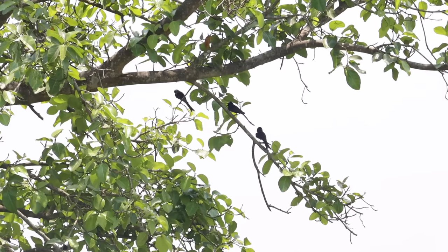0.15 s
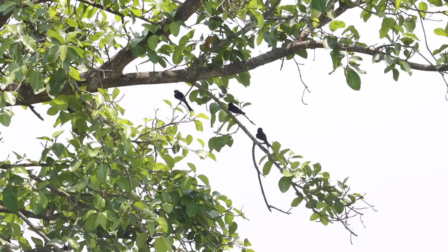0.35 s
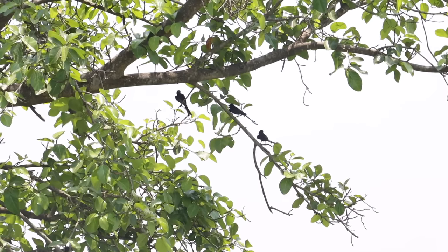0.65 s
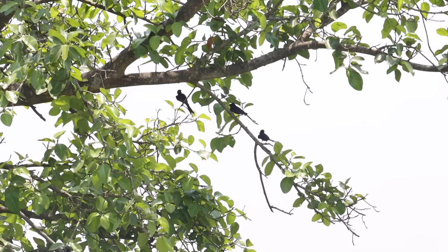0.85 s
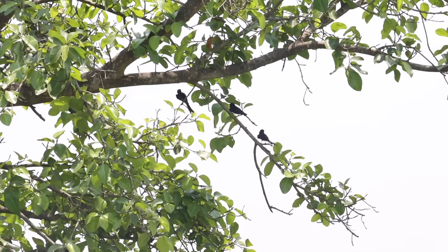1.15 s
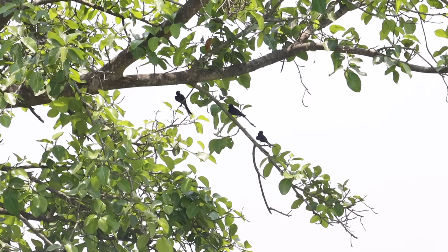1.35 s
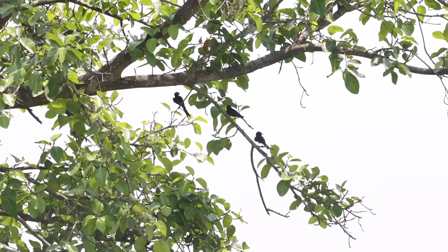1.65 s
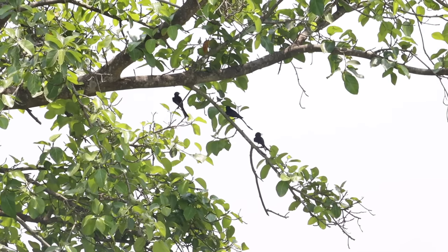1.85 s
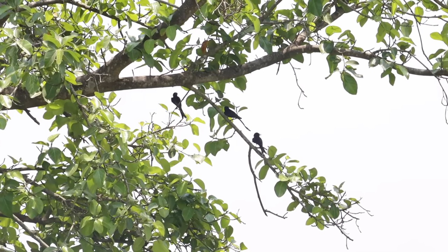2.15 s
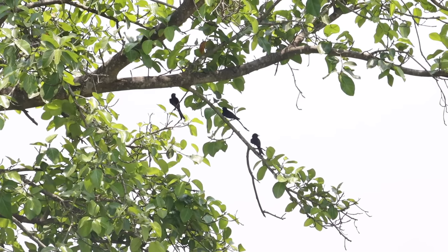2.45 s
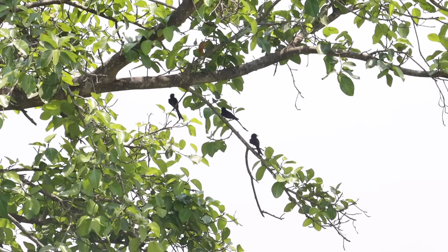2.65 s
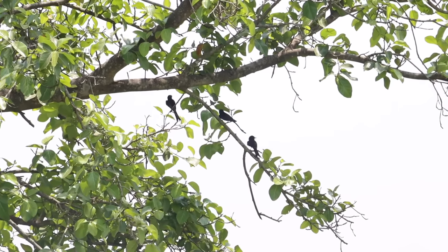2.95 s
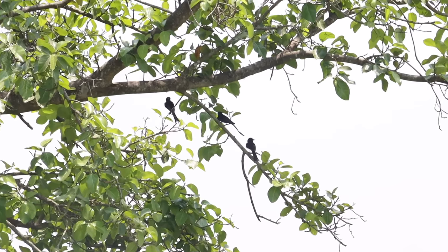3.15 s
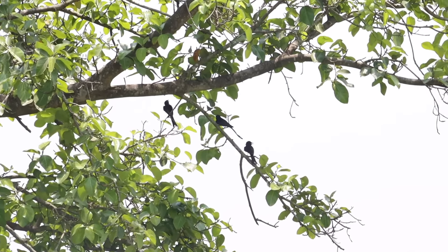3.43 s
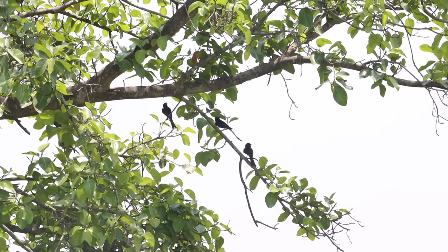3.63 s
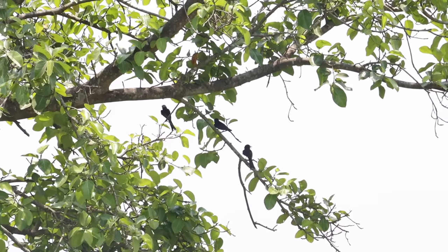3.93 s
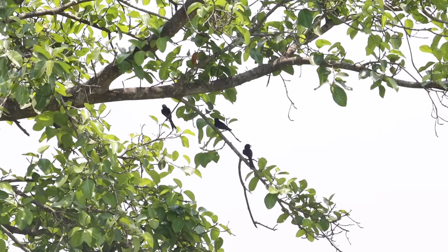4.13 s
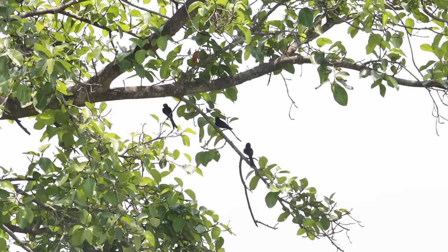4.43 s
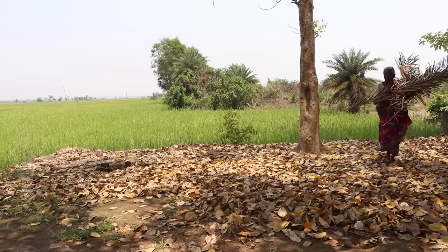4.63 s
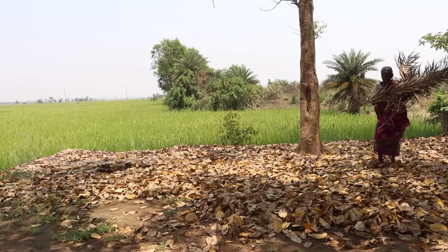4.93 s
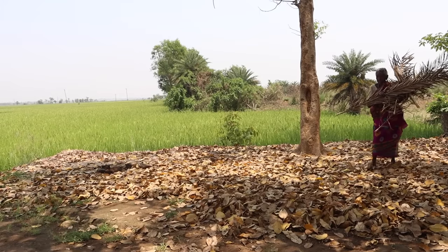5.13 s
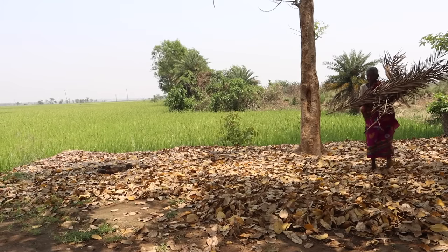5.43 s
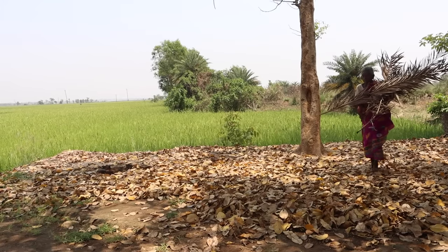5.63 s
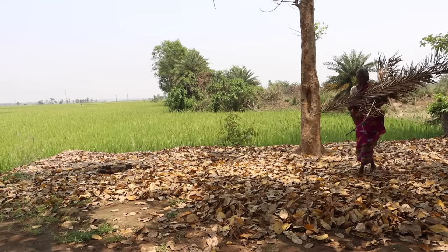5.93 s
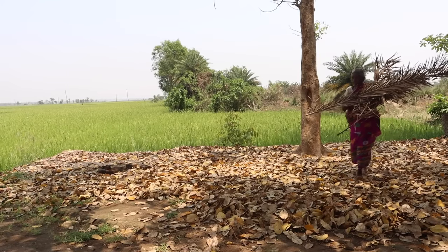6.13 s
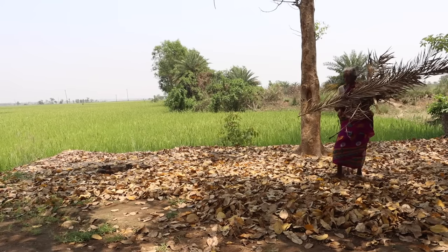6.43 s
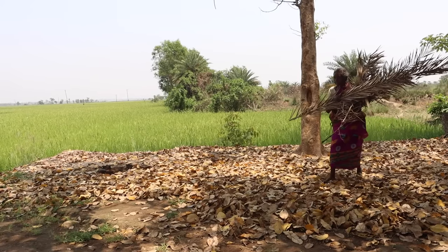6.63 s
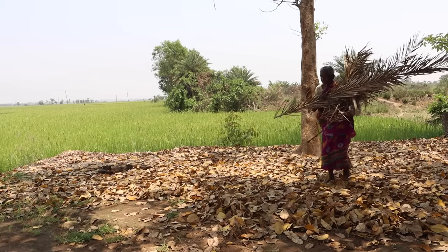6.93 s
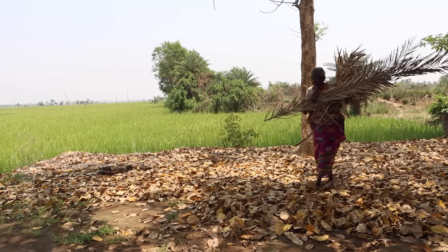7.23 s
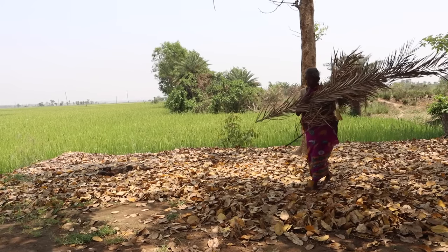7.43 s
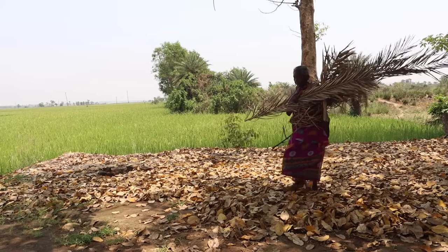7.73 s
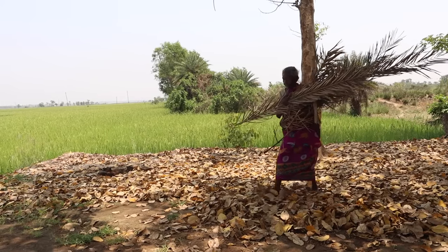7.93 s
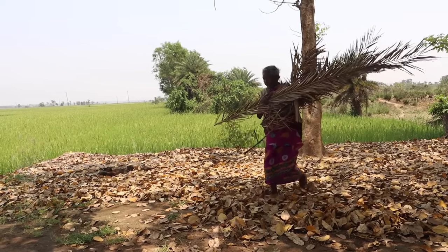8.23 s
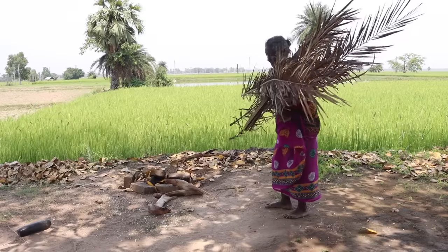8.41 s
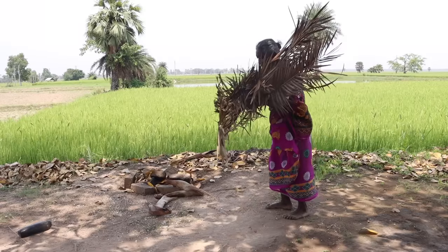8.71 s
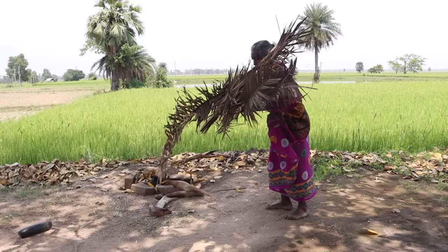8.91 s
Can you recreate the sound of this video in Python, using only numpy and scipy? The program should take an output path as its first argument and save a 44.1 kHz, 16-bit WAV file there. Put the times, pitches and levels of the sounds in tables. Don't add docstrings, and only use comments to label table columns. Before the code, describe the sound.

Quiet open countryside, close stereo microphone, little reverberation. From 0 to 4.5 s something stiff scrapes dry ground in short uneven strokes, grainy and midrange-bright with a slightly ringing body; faint ticks come at 0.2 s. Strokes strengthen around 1.9 and 2.6 s and become denser from 3 s. Distant birds give short hoarse whistles, clearest near 2 s, over faint air and a thin high insect band. At 4.55 s the scene cuts abruptly to dry palm fronds carried over dead leaves: loud crackling swish, swelling near 4.9, 6.5, 7.2 and 7.9 s, with sharp stalk snaps and brief dips as steps halt, moving from right to centre. Low wind puffs buffet one side or the other. At about 8.35 s another cut: fronds are lowered, the rustle softer but rising toward 9 s, with bright snaps and heavy low wind thumps, mostly left after 8.5 s.

```python
import sys
import numpy as np
from scipy import signal
from scipy.io import wavfile
from scipy.ndimage import uniform_filter1d

SR = 44100
rng = np.random.default_rng(int(sys.argv[2]) if len(sys.argv) > 2 else 0)


def transcribe(u):
    v = np.clip(np.atleast_2d(u).T, -1, 1)
    q = np.round(v * 32767).astype(np.int16)
    wavfile.write(sys.argv[1], SR, q)


def to_linear_factor(level_db):
    exponent = np.asarray(level_db, float) / 20
    return 10 ** exponent


N = 399987
TIME = np.arange(N) / SR
FIRST_CUT_S, SECOND_CUT_S = 4.5505, 8.355

# frequency in Hz, level in dB per Hz.
AIR_COLOUR = [(20, -70), (48, 3), (140, 0.5), (340, -4.5), (520, -11), (860, -12), (1400, -15.5),
              (1900, -11.5), (3100, -16), (5000, -19), (7000, -21), (9500, -26), (14500, -28)]
AIR_DB = -56
INSECT_HZ, INSECT_WIDTH_HZ, INSECT_DB = 10270, 820, -70
HUM_HZ, HUM_WIDTH_HZ, HUM_DB = 452.6, 19, -69
# frequency in Hz, share in common (0 to 1).
AIR_LIKENESS = [(60, 1), (300, 0.73), (800, 0.03), (3000, 0.036), (12000, 0.067)]
SCRAPE_LIKENESS = [(800, 0.72), (1500, 0.55), (3000, 0.52), (5000, 0.69), (12000, 0.21)]
FROND_LIKENESS = [(200, 1), (500, 0.83), (1000, 0.74), (1900, 0.44), (2600, 0.23), (6000, 0.34),
                  (14000, 0.1)]
# time in seconds, samples by which the left port hears later.
LEFT_LAG = [(0, -6), (1.7, -6), (1.71, 0), (4.55, 0), (4.551, 5.4), (6.5, 4), (8.3, 2.8), (9.07, 2)]

# start in seconds, length in seconds, first pitch in Hz, last pitch in Hz, level in dB.
CHIRPS = [(.735, .035, 5550, 5450, -52), (.75, .04, 4350, 4300, -55), (.77, .04, 4050, 4000, -57),
          (.78, .04, 3100, 3250, -58), (.16, .06, 5600, 5750, -66), (.1, .05, 2250, 2200, -64),
          (.2, .1, 2500, 2300, -66), (.74, .06, 2600, 2700, -62), (.94, .025, 6200, 5100, -57),
          (1.35, .12, 1300, 1250, -56), (1.41, .11, 3550, 3250, -55), (1.545, .02, 6600, 6300, -64),
          (1.57, .09, 3000, 2950, -62), (1.73, .09, 3600, 3500, -65), (1.81, .08, 2050, 2100, -61),
          (1.875, .025, 6200, 6000, -59), (1.93, .2, 1380, 1580, -51), (2.05, .08, 3300, 2900, -45),
          (1.93, .1, 2850, 3100, -46), (1.91, .09, 3880, 3850, -41), (2.165, .06, 2850, 3000, -52),
          (2.53, .1, 1550, 1450, -50), (2.345, .02, 6100, 4700, -63), (2.495, .02, 6200, 4800, -65),
          (2.7, .14, 2200, 2050, -59), (2.64, .12, 3350, 3330, -51), (2.705, .09, 4400, 4350, -56),
          (2.72, .08, 2400, 2450, -61), (4.26, .22, 4700, 4600, -48), (8.15, .06, 2850, 2850, -42)]

# time in seconds, peak in dB, seconds to rise or fall 20 dB, left minus right in dB.
GUSTS = [(4.588, -52.5, 0.06, 18.5), (4.745, -52, 0.1, 21), (5.522, -41.5, 0.14, -5), (5.6, -54, 0.5, 3),
         (5.73, -45, 0.04, -9), (5.903, -50.5, 0.06, 18), (6.043, -47, 0.13, 6), (6.125, -49, 0.09, -9),
         (6.84, -50, 0, 25), (7.05, -54.5, 0.8, 17), (7.1, -50, 0, 15), (7.19, -42.5, 0.07, 12),
         (7.335, -47, -0.02, 27), (7.65, -49, 0.1, -1), (7.83, -45, 0.03, 3.5), (8.36, -45.5, 0.03, 12),
         (8.49, -38, 0.1, 7), (8.6, -49, 0.2, 17), (8.73, -39.5, .08, 22), (8.86, -45, 0.04, 12),
         (9.031, -52, -0.2, 16)]
# frequency in Hz, level in dB per Hz.
GUST_COLOUR = [(25, -17), (50, -4.5), (80, 1), (130, -3), (200, -20), (320, -26.5), (600, -44.5)]
BREEZE_DB = -63.5
PUFF_RISE_SHARE = 0.55
# time in seconds, peak in dB, swing in Hz, left minus right in dB.
THUMPS = [(4.56, -39, 90, 16), (4.589, -28.5, 111, 13), (5.525, -34, 120, 3), (5.905, -33.5, 90, 18),
          (7.335, -32, 104, 17), (8.434, -26.5, 262, -16), (8.438, -21.5, 100, -16),
          (8.456, -23.5, 150, -8), (8.48, -27, 85, 9), (8.572, -33, 100, 14), (8.602, -33, 125, 18),
          (8.63, -38, 80, 21), (8.702, -28.5, 200, 21), (8.714, -23, 150, 17), (8.727, -25, 106, 17),
          (8.748, -33, 100, 14), (8.767, -26, 80, 11), (8.802, -34, 120, 14), (8.826, -25.5, 120, 17),
          (8.846, -23, 134, 16)]
THUMP_CYCLES = 0.57

# time in seconds, peak in dB, ring in Hz.
TICKS = [
    (0.22, -42, 7040),
    (0.2299, -41, 7170),
    (0.2409, -35, 5050),
    (0.2425, -36, 4370),
    (2.722, -42, 4400),
]
# time in seconds, peak in dB, ring in Hz, brightness in dB.
SNAPS = [(4.762, -25, 2850, -12), (5.54, -28, 1500, -7), (5.621, -24, 1310, -13), (5.769, -18, 1720, -1),
         (6.189, -31, 1640, -7), (6.345, -20, 1760, -6), (6.607, -17, 1650, -15.5),
         (6.781, -16.5, 2430, -9.5), (7.278, -17.5, 1680, -14), (8.102, -19, 980, -9.5),
         (8.627, -18, 2600, -6), (8.638, -23, 2780, -4), (8.81, -16.5, 1460, -20), (8.91, -26, 2000, 4),
         (4.8751, -11.5, 2380, 2), (4.938, -11, 1990, -5), (4.933, -9, 2290, -4), (5.3502, -4.5, 4100, -21),
         (5.408, -15, 2940, -9), (6.0248, -19, 7000, -22), (6.0688, -17.5, 1990, -15),
         (6.285, -15.5, 4400, -5), (6.456, -17.5, 1300, -11), (6.6216, -8.5, 1860, -15),
         (6.832, -15, 2750, -4), (7.036, -14.5, 2520, -37), (7.187, -15, 1880, 3.5),
         (7.2222, -5, 1870, -20), (7.328, -25, 1920, 7), (7.365, -10, 2430, -8), (7.4006, -6.5, 1850, -16),
         (7.676, -13.5, 4570, -13.5), (7.7188, -13, 2700, -12.5), (7.7776, -10.5, 4950, -1),
         (8.3481, -13, 2060, -23), (8.4462, -11.5, 6450, -11.5), (8.538, -26, 2740, -8),
         (8.556, -16.5, 3870, -9), (8.6182, -8, 9300, -11), (8.7674, -26, 1490, 6),
         (8.8119, -14, 2420, -21), (9.018, -11.5, 3000, -16), (9.05, -8, 9170, -7)]

# start in seconds, length in seconds, first level in dB, last in dB.
STROKES = [(0.052, .14, -60, -61), (0.25, .06, -65, -69), (0.381, 0.11, -40, -39.5),
           (0.502, .15, -43, -64.5), (0.738, 0.13, -52.5, -61), (0.975, 0.12, -48, -42.5),
           (1.112, .14, -41, -52), (1.317, 0.14, -46.5, -47.5), (1.55, 0.32, -66, -64),
           (1.905, 0.038, -40.5, -31), (1.953, 0.078, -31.5, -42.5), (2.038, 0.098, -35.5, -42.5),
           (2.169, 0.13, -47, -48), (2.544, 0.055, -39.5, -30.5), (2.591, 0.094, -28.5, -51),
           (2.717, 0.03, -49, -58), (3.03, 0.14, -39.5, -41.5), (3.144, .03, -38, -31.5),
           (3.176, .15, -30.5, -32), (3.451, .03, -39, -33.5), (3.48, 0.075, -33.5, -32),
           (3.55, 0.086, -29, -35), (3.74, 0.11, -50, -49), (3.873, 0.021, -37.5, -34),
           (3.905, .22, -37, -40.5), (4.146, 0.033, -34.5, -35.5), (4.266, .2, -38.5, -39.5)]
CATCH_DB_PER_S, LET_GO_DB_PER_S = 1198, 337
SCRAPE_MEAN_DB, SCRAPE_BODY_FOLLOWS, SCRAPE_HISS_FOLLOWS = -45, -0.15, 0.19
HISS_LAG_S, HISS_HELD_BACK = 0.011, 0.27
# a moment in seconds when a grip begins, then the end.
GRIP_FROM_S = [0, 1.7, 2.95, 3.72, 4.5505]
# frequency in Hz, level in dB per Hz.
GRIP_COLOURS = [
    [(470, -50), (800, -19), (1280, -5), (1990, -9), (2950, 4.5), (4080, 5), (5120, -6.5), (10300, -21),
     (12300, -27), (14000, -43)],
    [(470, -60), (800, -21.5), (1510, -13), (1830, -16), (2780, 0), (3890, 1.5), (4760, -6), (5570, -13),
     (10500, -26.5), (14000, -39)],
    [(470, -65.5), (800, -21.5), (2350, 0.5), (3890, 2), (6350, -7), (7250, -26), (9100, -15), (11000, -20),
     (13000, -24), (14500, -43)],
    [(470, -50), (800, -19), (1450, -10.5), (1900, -4), (2140, -1), (3370, -3), (4710, -2), (5240, -6),
     (6130, -2.5), (7250, -21.5), (10300, -17), (14000, -43)],
]
# frequency in Hz, width in Hz, level in dB.
GRIP_RINGS = [
    [(3110, 51, -6), (4030, 140, -2.5), (4400, 67, 0.5)],
    [(1540, 84, -14.5), (2960, 73, -10), (3300, 120, -1.5), (3870, 220, 3.5), (4570, 140, 2)],
    [(2755, 40, -0.5), (3890, 160, 0), (4790, 140, -2), (5700, 55, -10), (6450, 90, -6), (9260, 110, -14)],
    [(2034, 110, -6), (2750, 210, -2), (3770, 40, -11), (4100, 72, -3.5), (4670, 100, 2), (5970, 130, -9)],
]

# frequency in Hz, level in dB per Hz.
FROND_COLOUR = [(100, -45), (170, -14.5), (214, -10.5), (364, -4), (532, -15.5), (721, -5), (1230, -1.5),
                (1900, 1), (2480, 2.5), (4230, -2.5), (8380, -6.5), (10700, -7.5), (14000, -11.5),
                (16000, -55)]
# frequency in Hz, left minus right in dB.
FROND_BALANCE = [(110, 11), (200, -4), (380, 3.5), (700, -4.5), (1290, -2), (2380, -4.5), (4400, -3.5),
                 (8120, 0), (15000, -14.5)]
# time in seconds, peak in dB, seconds to rise 20 dB, to fall 20 dB, hiss in dB.
CARRIED = [(4.556, -43.5, 2.5, .3, -3), (4.7, -39, .08, .3, -3), (4.771, -30, .1, 0.87, -6.5),
           (4.939, -23.5, 0.3, 0.33, -5), (5.06, -29.5, 0.8, 0.2, 0.5), (5.25, -33.5, 0.45, 0.23, -0.5),
           (5.33, -41, .5, 0, .5), (5.41, -34.5, 0.1, 0.3, -3.5), (5.55, -37.5, 0.2, 0.07, -3),
           (5.63, -39, -0.1, 0.38, -10), (5.691, -31.5, 0.17, 0.24, -2.5), (5.796, -33, 0.1, 0.13, 1.2),
           (6.0, -45, 1.2, .5, -8), (6.04, -40.5, .1, 0.2, 0), (6.08, -41, .05, .1, -4),
           (6.195, -38, -0.5, 1.5, -7.5), (6.331, -32.5, .3, 0.47, 1.5), (6.47, -29, 0.1, 0.43, -4),
           (6.54, -27, 0.18, 0.1, -4.5), (6.63, -32, 0.2, 0, -1.5), (6.75, -31.5, 0.6, 0.12, 3),
           (6.93, -36, 0.2, .12, -1), (7.04, -30.5, -11, 0.43, -5.5), (7.211, -26.5, 0.26, 0.38, -1),
           (7.389, -30.5, 0.17, 0.26, 1), (7.494, -35.5, 0.3, 0.14, 4.5), (7.52, -37.5, -2.2, 3.5, -1),
           (7.68, -39.5, 2.7, 1.3, -2), (7.78, -32.5, 0.9, 0.8, -2), (7.89, -23, 0.14, 0.2, -6),
           (7.95, -28.5, 0.28, 0.04, -11.5), (8.03, -30, 0.3, 0.24, -4), (8.33, -34, 0.8, 3, -7.5)]
# time in seconds, peak in dB, seconds to rise 20 dB, to fall 20 dB, hiss in dB.
LOWERED = [(8.37, -45, -3, 0.5, -4.5), (8.553, -45, 0.2, -2, 2), (8.622, -41.5, 0.15, 0.2, -1),
           (8.77, -40, 0, 0.35, -2), (8.83, -38.5, 0.06, 0.2, -7.5), (9.02, -34.5, 0.34, 2, 1),
           (9.065, -37.5, 0.07, .3, 7)]
FRESH_STEPS_S = [0, 5.35, 6.022, 6.188, 7.034, 7.672]
FROND_BODY_DB, BODY_DB_PER_S, BODY_PER_HISS, LOWERED_BODY_DB = -11.5, 1.5, -0.31, -8
# frequency in Hz, width in Hz, level in dB re the rustle.
STALK_RINGS = [(753, 48, -26), (874, 66, -19), (1500, 180, -16.5), (1870, 155, -11.5), (2200, 290, -15),
               (2660, 200, -12.5)]
# time in seconds, level in dB.
STALKS_SHAKEN = [(4.6, -6), (4.95, -1.5), (5.3, -0.5), (5.5, -6), (5.75, -1), (6.1, 1), (6.4, -7),
                 (6.55, 3), (6.75, 1.5), (6.9, -1), (7.05, -5), (7.22, 3.5), (7.4, 1.5), (7.55, -6),
                 (7.9, 0.5), (8.3, 0), (8.4, -13), (8.8, -6)]


def rms_one(x):
    return x / np.sqrt(np.mean(x ** 2) + 1e-20)


def in_time(rows):
    s, *columns = np.transpose(rows)
    return [np.interp(TIME, s, c) for c in columns]


def at_hz(points, hz):
    table_hz, values = np.transpose(points)
    return np.interp(np.log(hz), np.log(table_hz), values)


def drift(rate, size):
    r = np.exp(-80 * np.pi * rate / SR)
    noise = rng.standard_normal(size // 40 + 2002)
    slow = rms_one(signal.lfilter([1], [1, -2 * r, r * r], noise)[2000:])
    return np.interp(np.arange(size) / 40, np.arange(len(slow)), slow)


def resonate(x, hz, width_hz):
    r = np.exp(-np.pi * width_hz / SR)
    poles = [1, -2 * r * np.cos(2 * np.pi * hz / SR), r * r]
    return signal.lfilter([(1 - r * r) / 2, 0, (r * r - 1) / 2], poles, x)


def wavering_ring(drive, hz, width_hz, waver):
    r = np.exp(-np.pi * width_hz / SR)
    pitch = hz * (1 + waver * drift(3.9, size=drive.shape[1]))
    turn = np.exp(2j * np.pi * np.cumsum(pitch) / SR)
    ring = signal.lfilter([1], [1, -2 * r, r * r], drive / turn) * turn
    return rms_one(ring.real)


def crackle(per_s, spread_db, decay_s, clump_db):
    born = rng.random(N) < per_s * to_linear_factor(clump_db * drift(25, size=N)) / SR
    power = to_linear_factor(2 * spread_db * np.minimum(rng.exponential(1, N), 4)) * born
    power = signal.lfilter([1], [1, -np.exp(-1 / (decay_s * SR))], power + 1e-18)
    return np.sqrt(power / power.mean())


def swells(s, peak_db, rise_s, fall_s, colour_db, starts=(0,)):
    coarse = TIME[::50]
    since = coarse - s[:, None]
    rising = -since / np.abs(rise_s)[:, None]
    falling = since / np.abs(fall_s)[:, None]
    flank = np.where(since < 0, rising, falling)
    begun = coarse >= np.array(starts)[np.searchsorted(starts, s) - 1, None]
    power = to_linear_factor(2 * (peak_db[:, None] - 20 * flank)) * begun + 1e-30
    total = power.sum(axis=0)
    return [np.interp(TIME, coarse, c) for c in (10 * np.log10(total), colour_db @ power / total)]


def tilted(spectrum, low_db, high_db, low_hz, high_hz):
    def colour_db(hz):
        lows = np.clip(np.log2(low_hz / hz) + 0.5, 0, 1)
        highs = np.clip(np.log2(hz / high_hz) + 0.5, 0, 1)
        fall = -30 * max(np.log2(spectrum[0][0] / hz), 0)
        return at_hz(spectrum, hz) + fall + lows * low_db + highs * high_db
    return colour_db


def banded_noise(span, colour_db, likeness, patchy_db, grains=None, grainy=0., balance=((1, 0), (2, 0))):
    first, last = span
    size = last - first
    out = np.zeros((2, N))
    edges = 25 * 2 ** np.arange(0, 9.5, 1 / 3)
    white = rng.standard_normal((2, 3, size))
    lag = np.round(in_time(LEFT_LAG)[0][first:last]).astype(int)
    later = np.clip(np.arange(size) - lag, 0, size - 1)
    common = [np.array([shared[later], shared]) for shared in white[:, 0]]
    for k, (low, high) in enumerate(zip(edges, edges[1:])):
        hz = np.sqrt(low * high)
        level_db = colour_db(hz)
        if np.max(level_db) < -44:
            continue
        alike = np.clip(at_hz(likeness, hz), 0, 1)
        pair = np.sqrt(alike) * common[k % 2] + np.sqrt(1 - alike) * white[k % 2, 1:]
        if grains is not None:
            share = np.clip(grainy * (hz / 4000) ** 0.038, 0, 1)
            pair = pair * np.sqrt(1 - share + share * grains[first:last] ** 2)
        band = signal.sosfilt(signal.butter(2, [low, high], "band", fs=SR, output="sos"), pair)
        sides = to_linear_factor(at_hz(balance, hz) / 2 * np.array([[1], [-1]]))
        out[:, first:last] += band * sides * to_linear_factor(level_db + patchy_db * drift(16.2, size=size))
    return out


def scatter(x, every_s, decay_s, wet_db):
    out = np.zeros((2, N + SR))
    step = int(every_s * SR)
    t = np.arange(int(0.06 * SR)) / SR
    for at in range(0, N, step):
        echoes = rng.standard_normal(len(t)) * np.exp(-t / decay_s) * (t > 0.001)
        echoes *= to_linear_factor(wet_db) / np.linalg.norm(echoes)
        echoes[0] = 1
        heard = signal.fftconvolve(x[:, at:at + step], echoes[None] / np.linalg.norm(echoes), axes=1)
        out[:, at:at + heard.shape[1]] += heard
    return out[:, :N]


def air():
    far = banded_noise((0, N), lambda hz: at_hz(AIR_COLOUR, hz), AIR_LIKENESS, 3.0)
    hiss = rng.standard_normal((2, N))
    chorus = resonate(hiss, INSECT_HZ, INSECT_WIDTH_HZ)
    insects = rms_one(resonate(chorus, INSECT_HZ, INSECT_WIDTH_HZ))
    hum = rms_one(resonate(hiss[0], HUM_HZ, HUM_WIDTH_HZ))
    return to_linear_factor(AIR_DB + 0.5) * rms_one(far) + to_linear_factor(INSECT_DB) * insects + to_linear_factor(HUM_DB) * hum


def birds():
    out = np.zeros(N)
    tremble = 1 + 0.012 * drift(120, size=N)
    for s, length, from_hz, to_hz, level_db in CHIRPS:
        at, size = int(s * SR), int(length * SR)
        glide = np.linspace(from_hz, to_hz, size) * tremble[at:at + size]
        whistle = np.sin(2 * np.pi * np.cumsum(glide) / SR)
        out[at:at + size] += to_linear_factor(level_db) * np.sqrt(np.hanning(size)) * whistle
    return out * to_linear_factor(3.0 * drift(60, size=N))


def wind():
    s, peak_db, flank_s, left_db = np.transpose(GUSTS)
    level_db, pan_db = swells(s, peak_db, PUFF_RISE_SHARE * flank_s, flank_s, left_db)
    pan_db = pan_db * np.clip((level_db - BREEZE_DB) / 8, 0, 1)
    level_db = np.maximum(level_db, BREEZE_DB)
    span = (int(FIRST_CUT_S * SR), N)
    rumble = banded_noise(span, lambda hz: at_hz(GUST_COLOUR, hz), [(30, 0.036), (600, 0.042)], 6.5)
    rumble = signal.sosfilt(signal.butter(2, 50, "high", fs=SR, output="sos"), rumble)
    rumble = rumble / np.sqrt(uniform_filter1d(rumble ** 2, size=800, axis=1) + 1e-12)
    return rumble * to_linear_factor(level_db + 4.0 + np.array([pan_db, -pan_db]) / 2) * (TIME > FIRST_CUT_S)


def thumps():
    out = np.zeros((2, N))
    phases = rng.uniform(0, 2 * np.pi, len(THUMPS))
    for (s, peak_db, hz, left_db), phase in zip(THUMPS, phases):
        at = slice(int((s - 0.04) * SR), int((s + 0.04) * SR))
        cycles = (TIME[at] - s) * hz
        swing = np.exp(-(cycles / THUMP_CYCLES) ** 2) * np.sin(2 * np.pi * cycles + phase)
        sides = to_linear_factor(left_db / 2 * np.array([[1], [-1]]))
        out[:, at] += to_linear_factor(peak_db) * sides / sides.mean() * swing
    return out


def add_break(out, s, peak_db, ring_hz, bright_db, left_db, cycles, width):
    t = np.arange(int(0.033 * SR)) / SR
    noise = rng.standard_normal((2, len(t)))
    ring = np.sin(2 * np.pi * ring_hz * t) + 0.25 * np.sin(2 * np.pi * 1.47 * ring_hz * t)
    ring = ring * np.exp(-t * ring_hz / cycles) * np.minimum(t * ring_hz / 1.65, 1)
    crack_fade = np.exp(-t / 0.00039) + 0.23 * np.exp(-t / 0.017)
    crack = resonate(noise[0], 8500, 7000) * to_linear_factor(bright_db + 9.0) * crack_fade
    tail = 0.67 * resonate(noise[1], ring_hz, ring_hz * width) * np.exp(-t / 0.013)
    lag = round(np.interp(s, *np.transpose(LEFT_LAG)))
    for channel, (delay, side_db) in enumerate(((lag, left_db / 2), (0, -left_db / 2))):
        at = round(s * SR) + delay
        out[channel, at:at + len(t)] += (to_linear_factor(peak_db + side_db) * (ring + crack + tail))[:N - at]


def snaps():
    out = np.zeros((2, N))
    for s, peak_db, ring_hz in TICKS:
        add_break(out, s, peak_db - 1.5, ring_hz, bright_db=-43, left_db=7.0, cycles=14, width=0.08)
    for s, peak_db, ring_hz, bright_db in SNAPS:
        add_break(out, s, peak_db - 3.0, ring_hz, bright_db, left_db=-6.5, cycles=4.5, width=0.5)
    return out


def pressure_db():
    s, length, first_db, last_db = np.transpose(STROKES)[:, :, None]
    coarse = TIME[::50]
    since = coarse - s
    db = first_db + (last_db - first_db) * np.clip(since / length, 0, 1)
    db = db + CATCH_DB_PER_S * np.minimum(since, 0) - LET_GO_DB_PER_S * np.maximum(since - length, 0)
    return np.interp(TIME, coarse, np.maximum(db.max(axis=0), -90))


def scraping():
    level_db = pressure_db()
    low_db, high_db = np.outer([SCRAPE_BODY_FOLLOWS, SCRAPE_HISS_FOLLOWS], level_db - SCRAPE_MEAN_DB)
    felt = np.maximum(level_db, -60) + 60
    keep = np.exp(-1 / (HISS_LAG_S * SR))
    built_up = signal.lfilter([1 - keep], [1, -keep], felt)
    high_db = high_db - HISS_HELD_BACK * np.maximum(felt - built_up, 0)
    grit = crackle(830, spread_db=2.5, decay_s=0.013, clump_db=1.5)
    drive = grit * rng.standard_normal((3, N))
    drive = drive[0] + 1.16 * drive[1:]
    out = np.zeros((2, N))
    marks = (np.array(GRIP_FROM_S) * SR).astype(int)
    for first, last, spectrum, rings in zip(marks, marks[1:], GRIP_COLOURS, GRIP_RINGS):
        colour = tilted(spectrum, low_db[first:last] + 0.23, high_db[first:last] + 3.5, 3900, 6100)
        out += to_linear_factor(9.0) * banded_noise((first, last), colour, SCRAPE_LIKENESS, 1.1, grit, grainy=0.073)
        for hz, width_hz, ring_db in rings:
            ring = wavering_ring(drive[:, first:last], hz, 2.2 * max(width_hz, 60), waver=0.015)
            out[:, first:last] += ring * to_linear_factor(ring_db - 7.5 + 2.5 * drift(4.0, size=last - first))
    dulled = signal.sosfilt(signal.butter(6, 13600, fs=SR, output="sos"), out)
    return dulled * to_linear_factor(level_db)


def stalks(breaks):
    size = len(breaks)
    drive = breaks * rng.standard_normal((3, size))
    drive = np.array([np.roll(drive[0], 4), drive[0]]) + 0.5 * drive[1:]
    rings = np.zeros((2, size))
    for hz, width_hz, db in STALK_RINGS:
        rings += rms_one(resonate(drive, hz, width_hz)) * to_linear_factor(db + 2.1 * drift(8.2, size=size))
    return rings * to_linear_factor([[-1.7], [1.7]])


def fronds():
    carried = TIME < SECOND_CUT_S
    carrying = swells(*np.transpose(CARRIED), FRESH_STEPS_S)
    lowering = swells(*np.transpose(LOWERED))
    level_db, high_db = np.where(carried, carrying, lowering)
    nearing_db = FROND_BODY_DB + BODY_DB_PER_S * (TIME - FIRST_CUT_S)
    low_db = np.where(carried, nearing_db, LOWERED_BODY_DB) + BODY_PER_HISS * high_db
    part = slice(int(FIRST_CUT_S * SR), N)
    fine = crackle(1400, spread_db=4.6, decay_s=0.0007, clump_db=1.3)
    coarse = crackle(60, spread_db=3.5, decay_s=0.03, clump_db=2.0)
    breaks = fine * np.sqrt(0.3 + 0.09 * coarse ** 2)
    colour = tilted(FROND_COLOUR, low_db[part] + 9.5, high_db[part] + 6.0, 1030, 4100)
    swish = banded_noise((part.start, N), colour, FROND_LIKENESS, 1.08, breaks, grainy=0.56,
                         balance=FROND_BALANCE)
    swish[:, part] += stalks(breaks[part]) * to_linear_factor(in_time(STALKS_SHAKEN)[0][part] - 9.5)
    return swish * to_linear_factor(level_db + 9.0)


def scene():
    background = air() + birds() + wind() + thumps()
    near_trees = scatter(scraping(), every_s=0.14, decay_s=0.007, wet_db=-2.5) * (TIME < FIRST_CUT_S)
    passing = scatter(fronds(), every_s=0.08, decay_s=0.005, wet_db=-6.5)
    return background + snaps() + near_trees + passing


def roll_off(x):
    return signal.sosfilt(signal.butter(12, 16510, fs=SR, output="sos"), x)


def record(dry):
    rounded = np.tanh(dry)
    top_cut = signal.cheby2(10, 60, 15680 + 500, fs=SR, output="sos")
    return roll_off(signal.sosfilt(top_cut, rounded))


dry = scene()
out = record(dry)
transcribe(out)
```